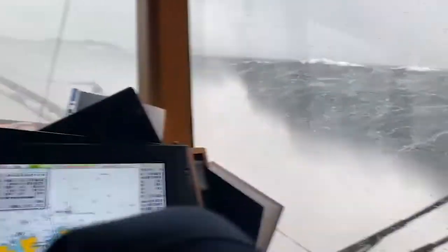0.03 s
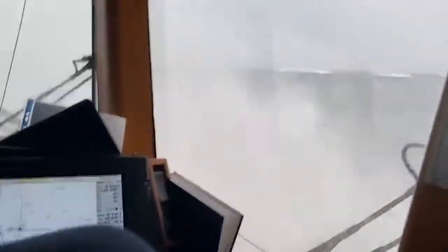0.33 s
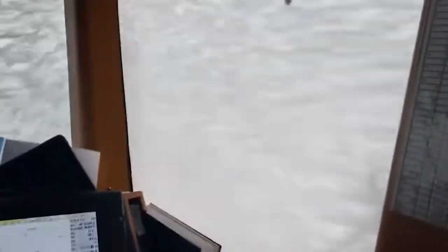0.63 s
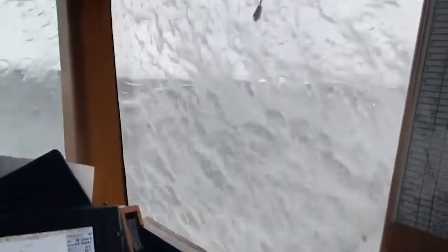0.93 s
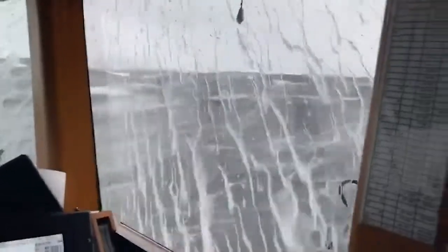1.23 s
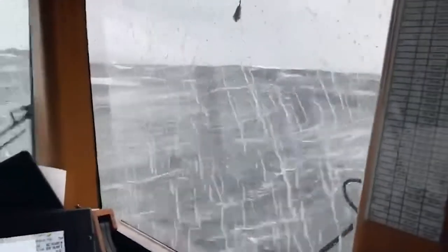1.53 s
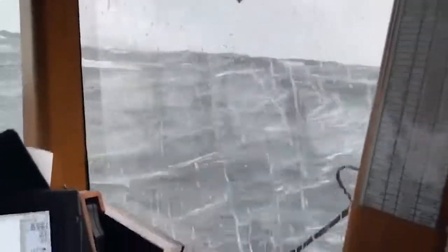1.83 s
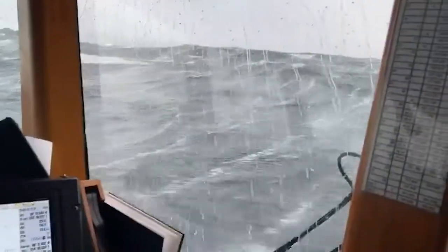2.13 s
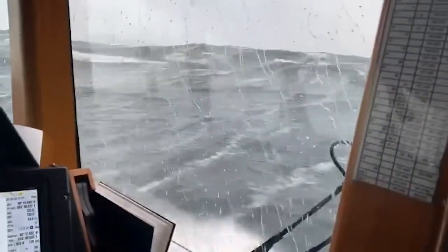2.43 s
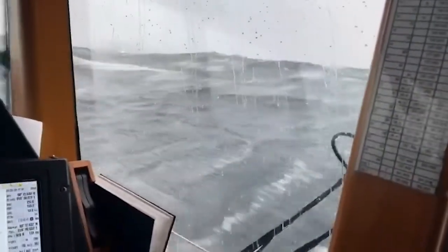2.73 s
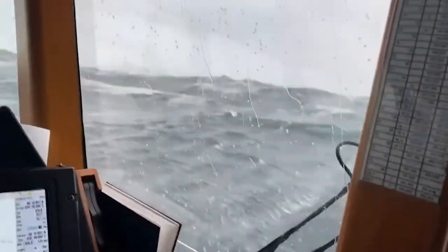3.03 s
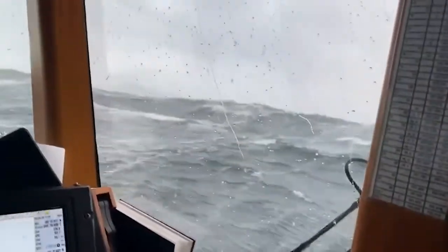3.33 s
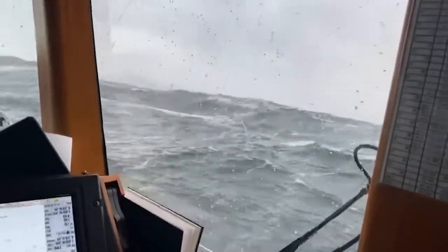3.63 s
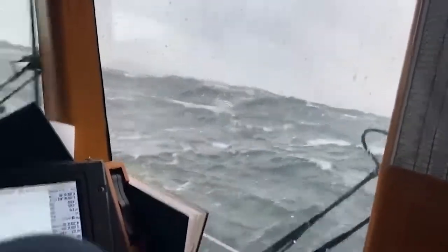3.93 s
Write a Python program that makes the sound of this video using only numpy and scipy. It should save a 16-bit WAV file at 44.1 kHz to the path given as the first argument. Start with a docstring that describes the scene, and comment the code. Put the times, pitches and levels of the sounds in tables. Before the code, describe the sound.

A wave bursts over a motor boat, spray and heavy water pelting the windows, then draining away. Heard from inside the wheelhouse, the hull rumbles and booms, the propeller throbs, the sea washes and loose gear rattles.

```python
"""Inside the wheelhouse of a motor boat in a gale. Throughout, the hull rumbles, the propeller throbs and
the sea washes and churns outside. Just after the start the sound drops out briefly. A wave bursts over
the bow: fine spray, then heavy water, pelts the windows and drains away within two seconds. Meanwhile,
and on to the end, waves ring the cabin panels, loose gear rattles and the hull booms in the troughs.
As the wave fades, stray drops tick on the glass and a joint creaks once."""
import sys
import numpy as np
from scipy import signal
from scipy.fft import rfft, irfft
from scipy.io import wavfile
from scipy.ndimage import uniform_filter1d, map_coordinates

SR = 44100
rng = np.random.default_rng(int(sys.argv[2]) if len(sys.argv) > 2 else 0)


def pcm_store(signal):
    """Save signal as 16-bit PCM."""
    levels = np.round(np.clip(np.atleast_2d(signal), -1, 1) * 32767)
    wavfile.write(sys.argv[1], SR, levels.astype(np.int16).T)


N = 176400


def undb(db):
    """Amplitude ratio of a level in decibels."""
    return 10 ** (np.asarray(db) / 20)


def unit(x):
    """Normalisation to unit rms."""
    return x / np.sqrt(np.mean(x ** 2) + 1e-18)


def clock():
    """Sample times, t/s."""
    return np.arange(N) / SR


def curve(table, column=1):
    """Linear interpolation of one column over time."""
    rows = np.array(table)
    return np.interp(clock(), rows[:, 0], rows[:, column])


def colour(x, spectrum):
    """Spectral shaping by (f/Hz, level/dB) rows, to unit rms."""
    hz, db = np.array(spectrum).T
    bins = np.maximum(np.arange(N // 2 + 1) * SR / N, 1)
    gain = undb(np.interp(np.log(bins), np.log(hz), db))
    return unit(irfft(rfft(x) * gain, N))


def wander(hz):
    """Smooth random modulation with a spread near one."""
    knots = rng.standard_normal(1024)
    return map_coordinates(knots, [clock() * hz], order=2, mode="mirror")


def impacts(per_s, spread_db):
    """A Poisson process of clicks, most small and a few large."""
    hit = rng.random(N) < per_s / SR
    size = undb(spread_db * np.minimum(rng.exponential(size=N), 4))
    return unit(hit * size * rng.choice([-1, 1], N))


def cabin(x, t60_s=.2, echo_db=1):
    """Reverberation: diffuse reflections follow the direct sound and decay exponentially."""
    t = clock()[:SR // 2]
    tail = rng.standard_normal(len(t)) * np.exp(-np.log(1000) * t / t60_s) * (t > .003)
    return x + undb(echo_db) * signal.fftconvolve(x, tail / np.linalg.norm(tail))[:N]


def patter(per_s, spread_db, places=3):
    """Incoherent addition of impacts at several places, each with its own echoes."""
    return unit(sum(cabin(impacts(per_s / places, spread_db)) for _ in range(places)))


def resonate(x, modes):
    """Forced resonance: each mode band-passes the drive twice; the sum has unit rms."""
    ring = np.zeros(N)
    for hz, width, db in modes:
        b, a = signal.iirpeak(hz, hz / width, fs=SR)
        ring += undb(db) * unit(signal.lfilter(b, a, signal.lfilter(b, a, x)))
    return unit(ring)


def bursts(events):
    """Summed envelopes, each with exponential growth to a peak and exponential decay."""
    t = clock()
    return sum(undb(db) * np.exp(np.minimum((t - peak) / rise, (peak - t) / decay))
               for peak, db, rise, decay in events)


def spray(peak_drops_per_s=4100, mist_db=3.5, flicker_db=.92):
    """Impact noise: drops pelt the glass in a hiss of mist and thin out as the wave passes."""
    # fine spray on the glass: t/s, level/dB
    levels = [(0, -30), (.08, -38.5), (.18, -33), (.26, -27.5), (.44, -27.5), (.6, -30), (.77, -32.5),
              (.89, -30.5), (1.08, -39), (1.4, -46.5), (1.9, -61)]
    # its spectrum: f/Hz, level/dB
    spectrum = [(300, -23.5), (900, -6.5), (1500, -7), (2150, -2), (2800, -1), (3300, -5), (4400, -8),
                (5500, -14), (7000, -16.5), (8500, -29.5)]
    gain = undb(curve(levels))
    drops = patter(peak_drops_per_s * np.sqrt(gain / gain.max()), spread_db=3)
    mist = undb(mist_db) * rng.standard_normal(N)
    return colour(drops + mist, spectrum) * gain * undb(flicker_db * wander(hz=40))


def heavy_water(flicker_db=1.1):
    """Impact excitation: lumps of water set the roof and windows drumming."""
    # water on the wheelhouse: t/s, level/dB
    levels = [(0, -34), (.2, -40), (.33, -34.5), (.43, -27), (.54, -28), (.68, -27), (.8, -35.5), (.9, -34),
              (1.0, -39.5), (1.35, -53), (1.6, -61)]
    # its spectrum: f/Hz, level/dB
    spectrum = [(90, -11.5), (200, 3.5), (400, 2.5), (510, -5.5), (640, -6), (765, 2.5), (920, -8),
                (1350, -5), (1620, -6), (1800, -1.5), (2000, -6), (3200, -12), (8000, -52)]
    drum = colour(patter(per_s=2000, spread_db=1, places=5), spectrum)
    return drum * undb(curve(levels) + flicker_db * wander(hz=45))


def sea(hiss_db=-4, flicker_db=.82):
    """Superposition: foam and wind-blown drops merge into a broadband wash."""
    # wash of the sea: t/s, level/dB
    levels = [(0, -34.5), (1.5, -45), (1.72, -42.5), (2.22, -45), (2.45, -42.5), (2.72, -43), (2.77, -45),
              (3.17, -42.5), (3.4, -45.5), (3.56, -40.5), (3.72, -46), (4, -42.5)]
    # its spectrum: f/Hz, level/dB
    spectrum = [(200, -11), (500, 2.5), (800, 2), (1060, 1.5), (1400, 0), (1800, 2), (2300, 0.5), (2800, 1),
                (3500, -5), (4500, -9.5), (6000, -13), (8500, -25.5)]
    foam = patter(per_s=1600, spread_db=2.5) + undb(hiss_db) * rng.standard_normal(N)
    return colour(foam, spectrum) * undb(curve(levels) + flicker_db * wander(hz=18))


def churn():
    """Random impulses: water knocks on the sides, overlapping into a dull churning."""
    # water along the sides: t/s, level/dB
    levels = [(0, -39), (1.1, -36), (1.5, -36), (2.3, -35), (2.65, -33), (3.15, -33), (3.38, -38.5),
              (3.52, -33), (3.7, -38.5), (4, -36.5)]
    # its spectrum: f/Hz, level/dB
    spectrum = [(70, -20.5), (130, 1), (200, 5), (245, -.5), (325, -.5), (400, -8.5), (490, -22.5),
                (900, -34), (2000, -67)]
    knocks = patter(per_s=900, spread_db=2.5, places=6)
    return colour(knocks, spectrum) * undb(curve(levels))


def hull(sway_db=.5):
    """Forced vibration: engine and rushing water keep the hull rumbling."""
    # rumble of the hull: t/s, level/dB
    levels = [(0, -29), (.6, -24), (1.5, -24), (2.5, -25), (3.3, -24.5), (3.7, -25.5), (4, -27.5)]
    # its spectrum: f/Hz, level/dB
    spectrum = [(12, -23.5), (26, -13.5), (38, -4.5), (56, 3), (80, -1.5), (96, -2.5), (130, -3),
                (168, -16), (240, -27.5), (400, -31.5), (800, -41), (2000, -75.5)]
    rumble = colour(rng.standard_normal(N), spectrum)
    return rumble * undb(curve(levels) + sway_db * wander(hz=9))


def propeller(waver=.011, throb_db=2):
    """Frequency and amplitude modulation: a throbbing tone sinks and swells under load."""
    # propeller drone: t/s, f/Hz, level/dB
    drone = [(0, 70.65, -31), (.3, 72.6, -26), (.53, 84.63, -27), (.8, 80.77, -30), (1.05, 79.8, -29),
             (1.55, 81, -23.5), (1.85, 82.96, -28), (2.1, 81.23, -34.5), (2.6, 80.9, -30.5),
             (3.0, 80.97, -28), (3.3, 76.2, -36.5), (3.52, 73.13, -31.5), (3.62, 69.8, -18.5),
             (3.78, 71.1, -25.5), (3.89, 70.4, -18.5), (4, 66.8, -24.5)]
    hz = curve(drone) * (1 + waver * wander(hz=10))
    tone = np.sqrt(2) * np.sin(2 * np.pi * np.cumsum(hz) / SR)
    return tone * undb(curve(drone, column=2) + throb_db * wander(hz=15))


def bumps(push_decay_s=.012):
    """Modal ringing: a short rough push of water excites the damped cabin panels."""
    # waves bumping the hull: t/s, level/dB
    hits = [(0.129, -31.5), (.606, -30), (.672, -29.5), (.872, -29), (2.07, -29.5), (2.515, -34.5),
            (3.277, -28.5)]
    # panel modes: f/Hz, level/dB, T60/s
    modes = [(188, 0, 0.13), (251.6, 4, 0.092), (299, 4.5, 0.068), (336.4, -3, 0.19), (411, -5.5, 0.11),
             (560, -12, 0.11), (700, -14.5, 0.06), (1040, -19, 0.09)]
    t, out = clock()[:SR // 4], np.zeros(N + SR)
    ring = sum(undb(db) * np.sin(2 * np.pi * hz * t) * np.exp(-np.log(1000) * t / t60)
               for hz, db, t60 in modes)
    for onset, db in hits:
        push = rng.standard_normal(len(t)) * np.exp(-t / push_decay_s)
        knock = signal.fftconvolve(push, ring)[:len(t)]
        start = int(onset * SR)
        out[start:start + len(t)] += undb(db) * knock / np.std(knock[:SR // 30])
    return out[:N]


def rattles():
    """Repeated collisions: each shift of loose gear is a swarm of ticks that rings its modes."""
    # shifts of the gear: t/s, level/dB, rise/s, decay/s, tilt/(dB per octave), ring/dB
    shifts = [(0.137, -24.5, 0.009, 0.0081, 1.5, -18), (2.053, -40, 0.01, 0.029, 0, -22),
              (2.143, -37, 0.0095, 0.02, 0, -16), (2.53, -36.5, 0.0069, 0.036, 0, -16),
              (2.71, -39, .025, 0.023, -3.5, -20), (2.94, -45, 0.013, .024, -2, -7),
              (3.55, -43.5, 0.01, .02, -3.5, -16), (3.817, -34, 0.012, 0.03, 1, -13),
              (3.868, -37, .0044, .027, -3, -3), (3.991, -25, 0.002, 0.028, -.5, -5)]
    # tick spectrum before tilting: f/Hz, level/dB
    spectrum = [(300, -9.5), (900, -8.5), (1170, -1), (1320, -3.5), (1700, 0), (2600, 2), (3100, 1),
                (3450, -1.5), (3800, -1.5), (5200, -12.5), (6500, -11.5), (8500, -20)]
    # gear modes: f/Hz, width/Hz, level/dB
    modes = [(1174, 120, -8), (3310, 270, -0.5)]
    ticks = patter(per_s=2200, spread_db=0, places=2)
    ring = resonate(ticks, modes)
    out = np.zeros(N)
    for peak, db, rise, decay, tilt, ring_db in shifts:
        tilted = [(hz, level + tilt * np.log2(hz)) for hz, level in spectrum]
        clatter = unit(colour(ticks, tilted) + undb(ring_db) * ring)
        out += bursts([(peak, db, rise, decay)]) * clatter
    return out


def slaps():
    """Transient noise: a sheet of water lands as a dense burst of impacts."""
    # sheets hitting the wheelhouse: t/s, level/dB, rise/s, decay/s
    sheets = [(.435, -26.5, 0.04, 0.037), (.5, -30, 0.018, .025), (.538, -23.5, 0.011, 0.0056),
              (.88, -33, 0.018, 0.07), (2.69, -44, 0.017, .03), (3.175, -38, 0.0091, 0.011),
              (3.585, -42, 0.034, 0.013)]
    # their spectrum: f/Hz, level/dB
    spectrum = [(200, -16.5), (500, -6.5), (800, 0.5), (1100, 0), (1500, -1), (2200, -6), (3000, -10),
                (4500, -21.5), (8500, -35.5)]
    return bursts(sheets) * colour(patter(per_s=3000, spread_db=3.8), spectrum)


def slams(rise_s=.028):
    """Damped oscillation: the whole hull booms as it drops into a trough."""
    # booms of the hull: t/s, level/dB, f/Hz
    booms = [(0.755, -18.5, 53), (1.355, -29, 45.93), (2.084, -26, 47), (2.267, -16.5, 54.7),
             (2.66, -28, 42), (3.495, -21, 39.6), (3.819, -19.5, 47.5)]
    out = np.zeros(N)
    for onset, db, hz in booms:
        age = np.maximum(clock() - onset, 0)
        envelope = age / rise_s * np.exp(1 - age / rise_s)
        out += undb(db) * envelope * np.sin(2 * np.pi * hz * age)
    return out


def drizzle():
    """Brief impacts carry high frequencies: stray drops tick lightly on the glass."""
    # light spray blown back: t/s, level/dB
    levels = [(0, -60), (1.5, -52), (2.2, -55.5), (2.4, -52), (2.7, -49), (2.82, -59.5), (3.2, -55),
              (4, -63)]
    # its spectrum: f/Hz, level/dB
    spectrum = [(800, -14.5), (2500, -1), (4300, -0.5), (6000, -2.5), (8500, -20.5)]
    return colour(patter(per_s=350, spread_db=2), spectrum) * undb(curve(levels))


def creak():
    """Stick-slip friction: quick, irregular slips ring the resonances of a joint."""
    # faint creak: t/s, level/dB
    levels = [(1.6, -86), (1.66, -44), (1.72, -44.5), (1.765, -46), (1.83, -80)]
    # joint modes: f/Hz, width/Hz, level/dB
    modes = [(1010, 110, -4.5), (1740, 150, -0.5), (2330, 900, -9.5)]
    slips = patter(per_s=270, spread_db=1.5)
    return resonate(slips, modes) * undb(curve(levels))


def scene():
    """Superposition of water and boat, as heard behind the windows."""
    water = spray() + heavy_water() + slaps() + sea() + drizzle() + churn()
    boat = hull() + propeller() + rattles() + creak() + bumps() + slams()
    return (water + boat)[None]


def record(dry, dip_db=-26, cutoff_hz=8850):
    """Attenuation: the level dips briefly near the start, and a low-pass filter cuts the top."""
    t = clock()
    dip = uniform_filter1d(1. * ((t > .014) & (t < .055)), size=128)
    low_pass = signal.ellip(10, .2, 90, cutoff_hz, fs=SR, output="sos")
    return signal.sosfilt(low_pass, dry * undb(dip_db * dip))


dry = scene()
out = record(dry)
pcm_store(out)
```